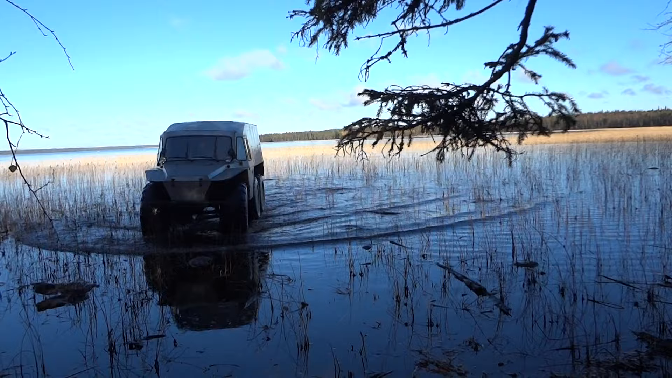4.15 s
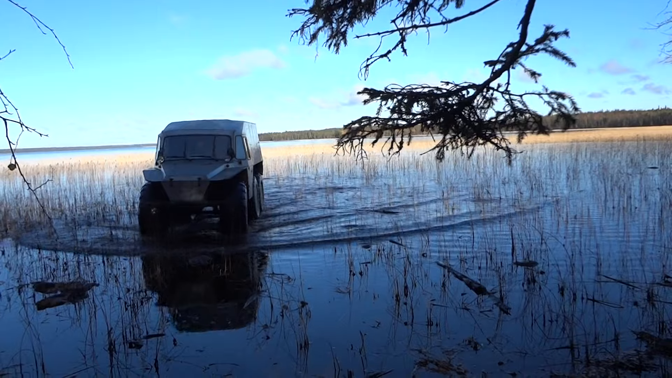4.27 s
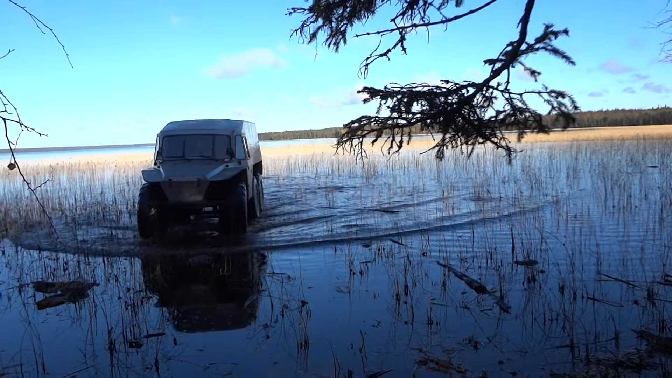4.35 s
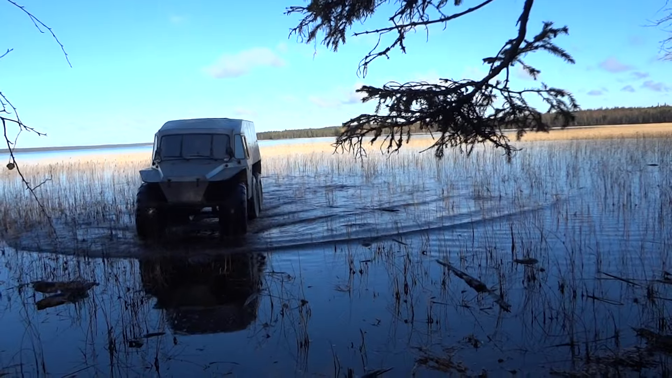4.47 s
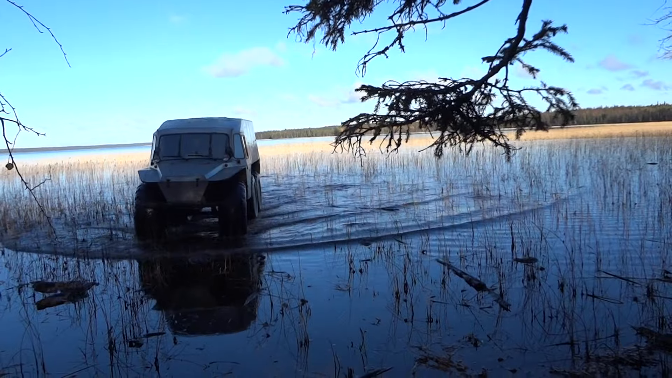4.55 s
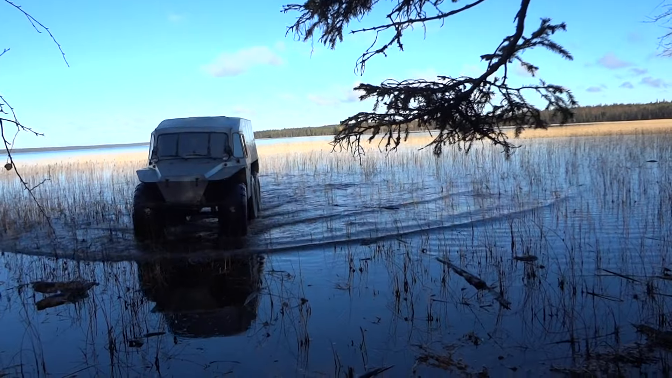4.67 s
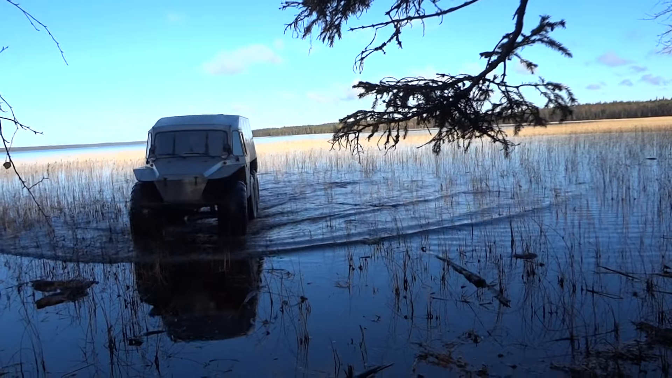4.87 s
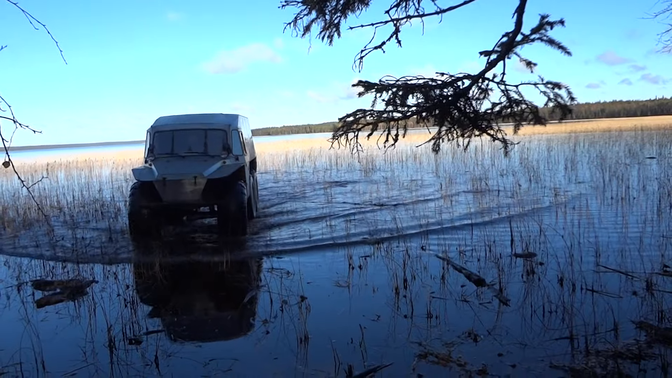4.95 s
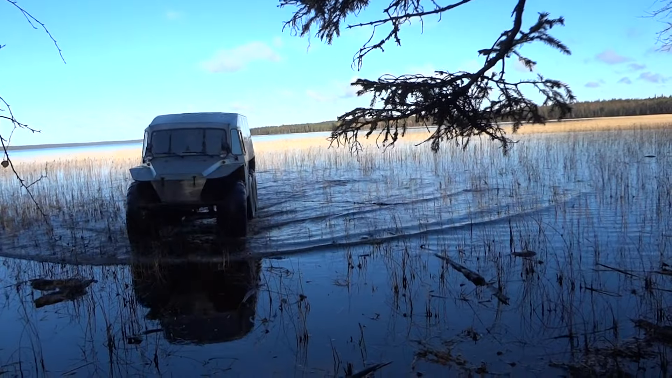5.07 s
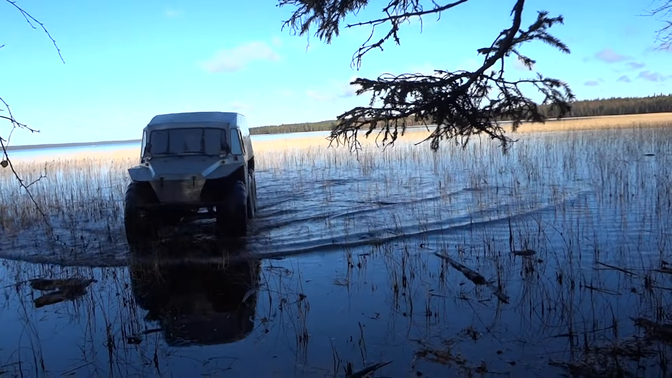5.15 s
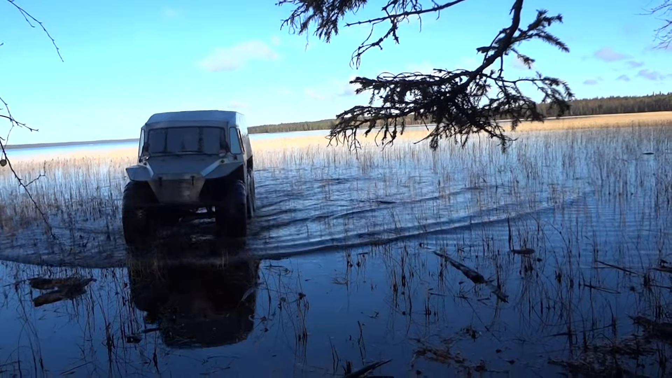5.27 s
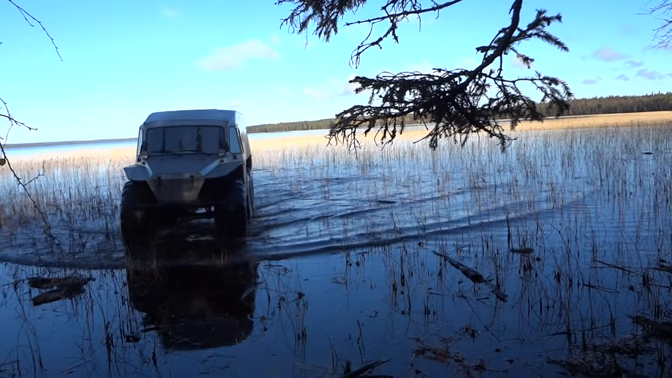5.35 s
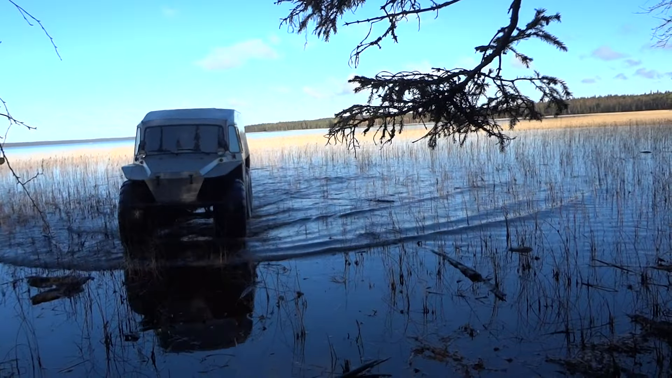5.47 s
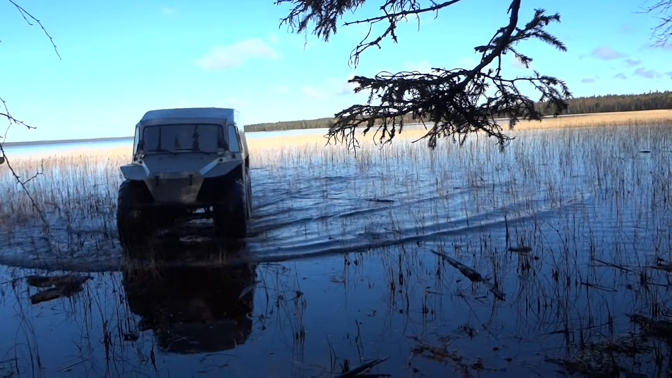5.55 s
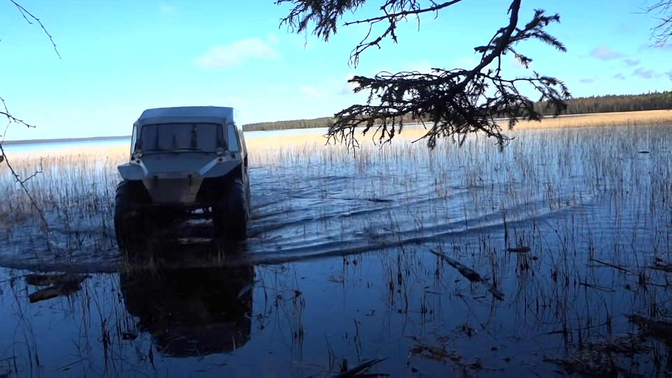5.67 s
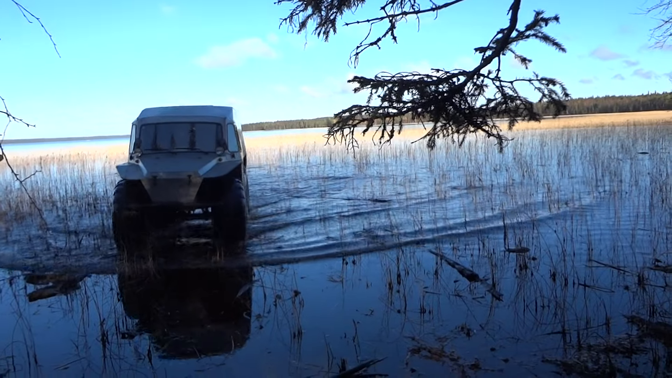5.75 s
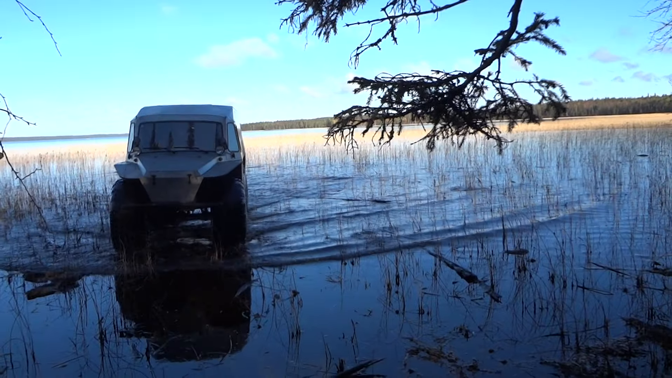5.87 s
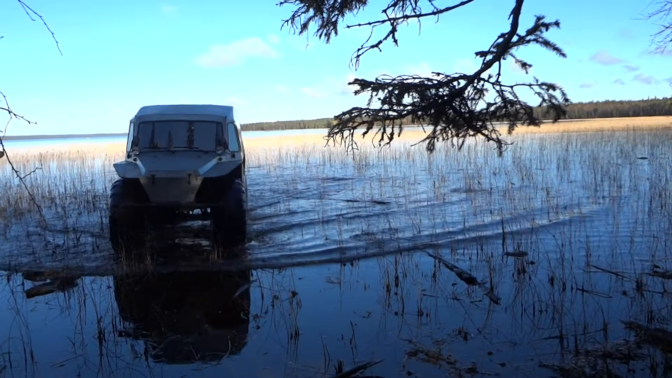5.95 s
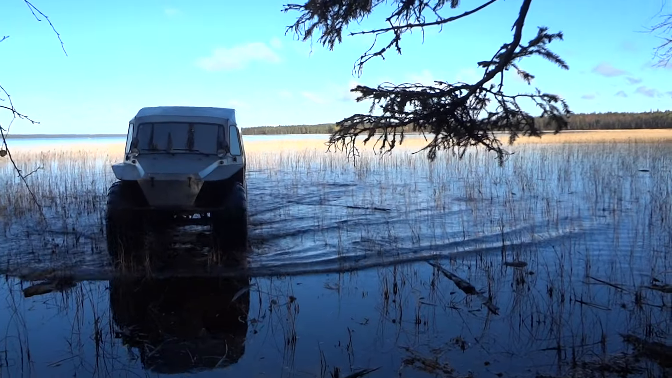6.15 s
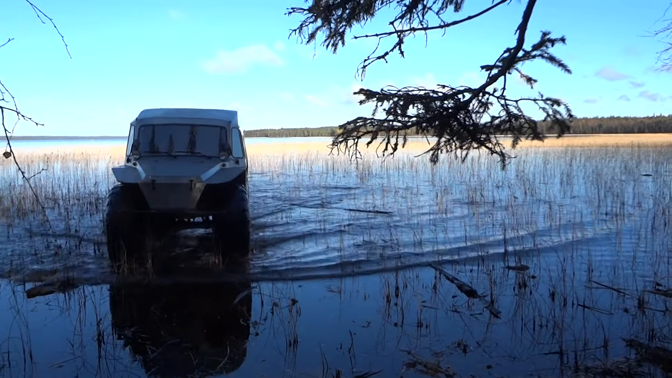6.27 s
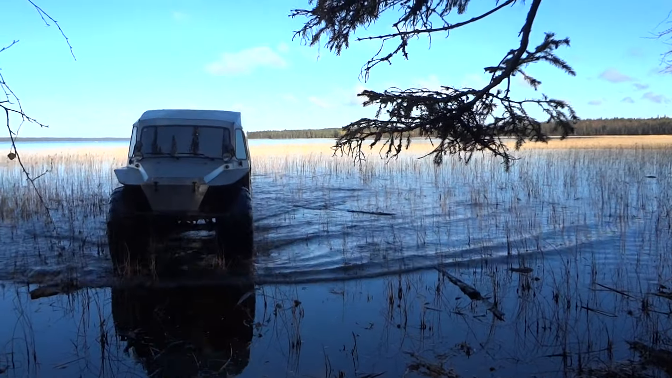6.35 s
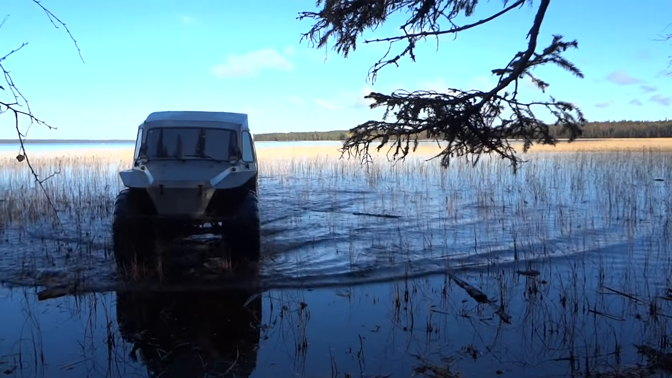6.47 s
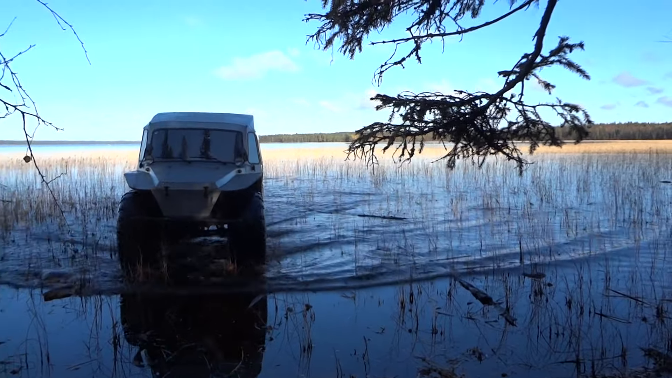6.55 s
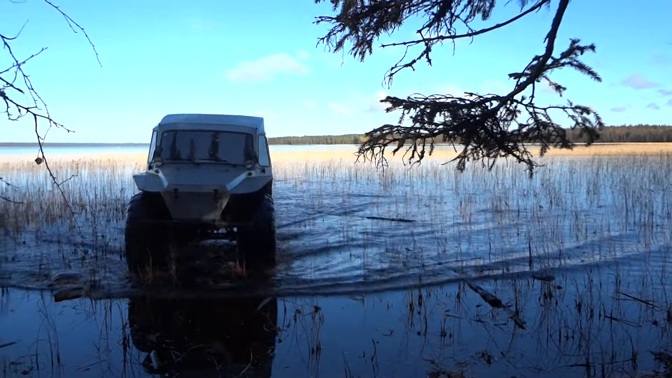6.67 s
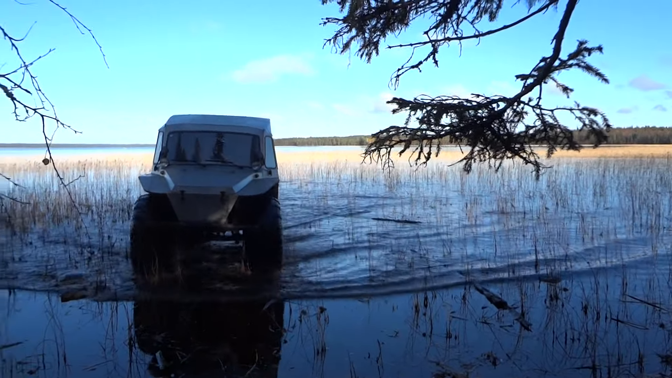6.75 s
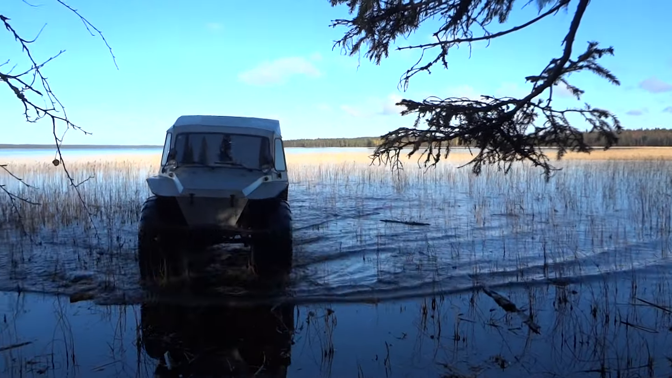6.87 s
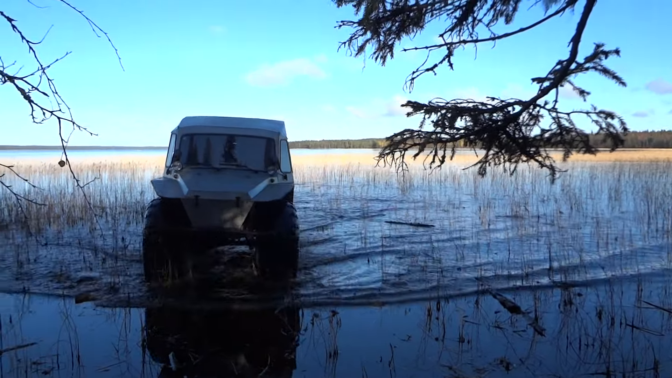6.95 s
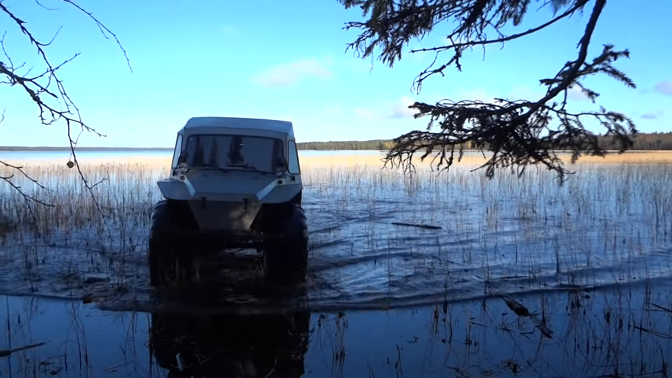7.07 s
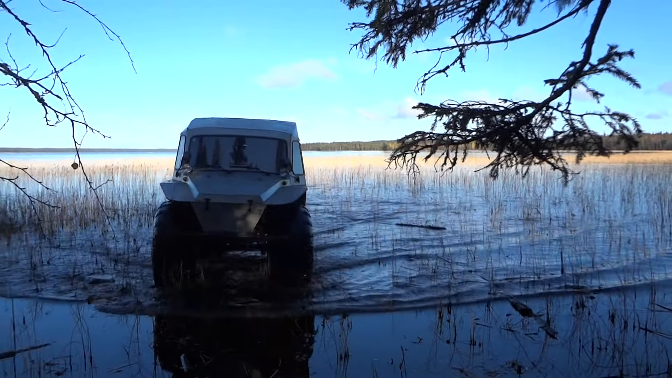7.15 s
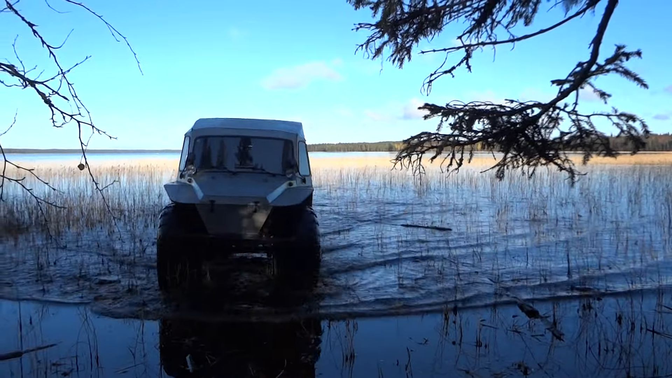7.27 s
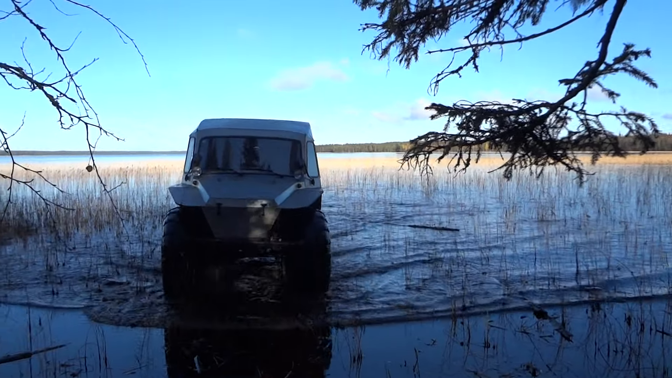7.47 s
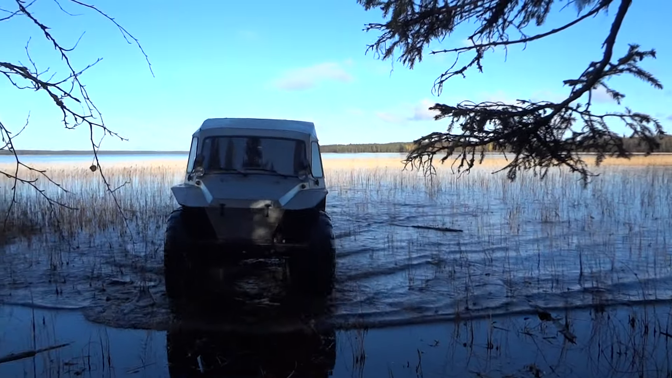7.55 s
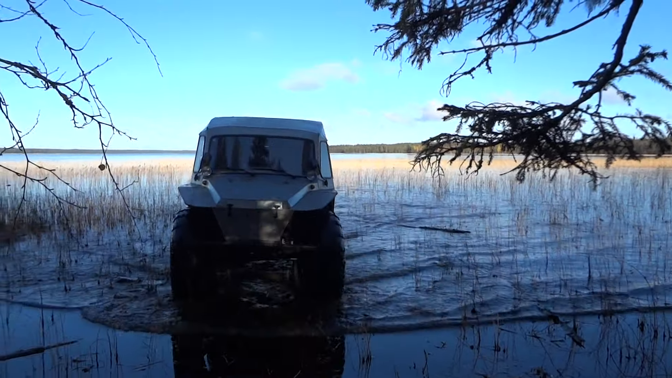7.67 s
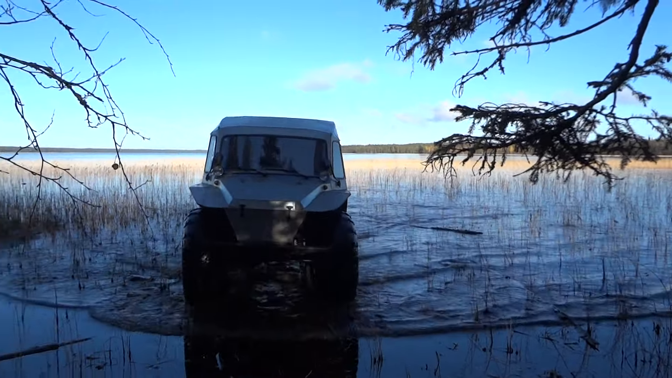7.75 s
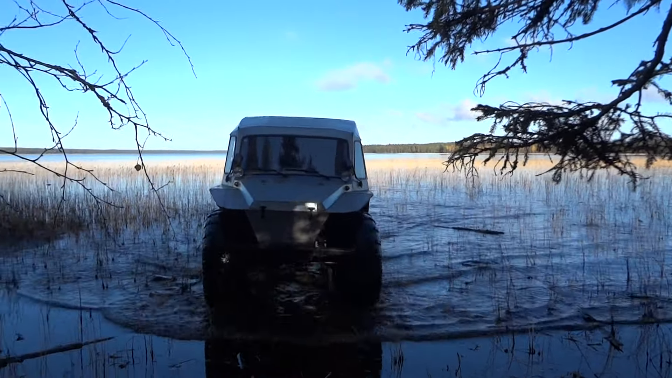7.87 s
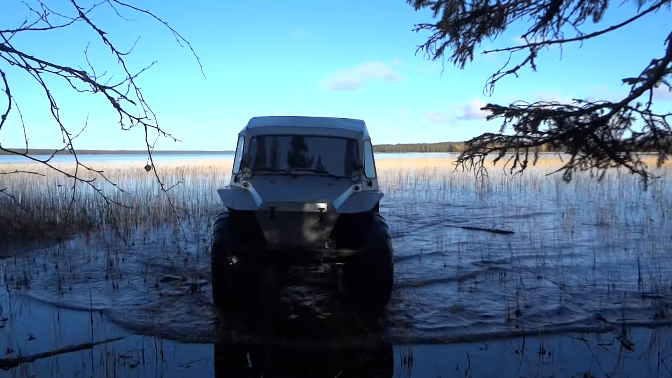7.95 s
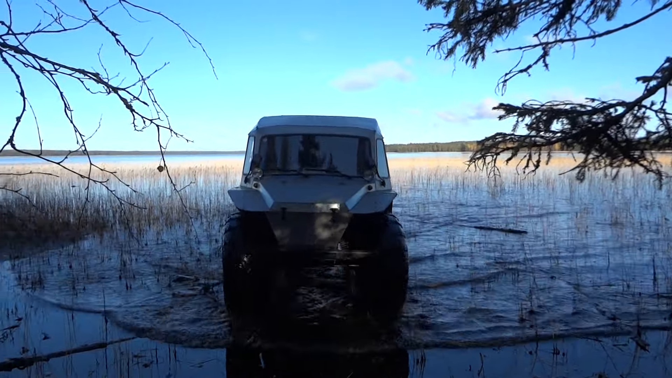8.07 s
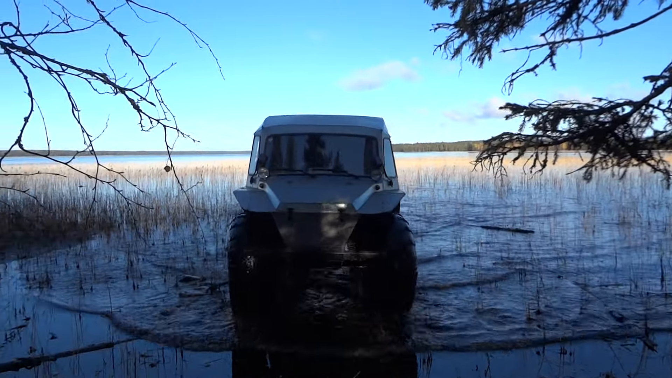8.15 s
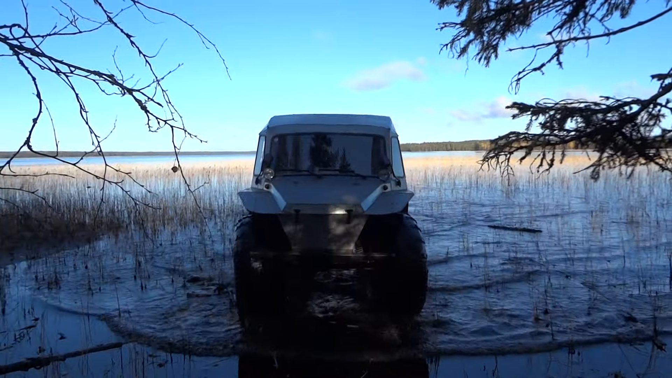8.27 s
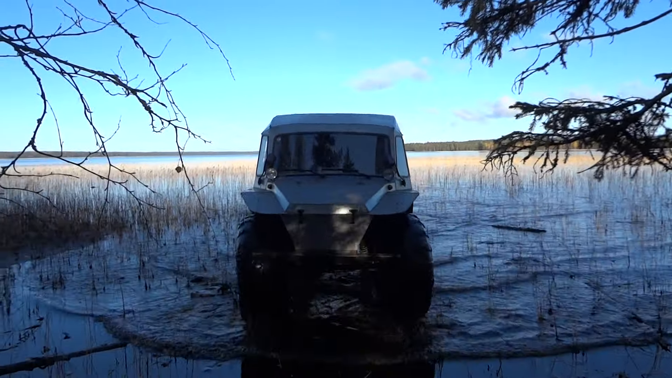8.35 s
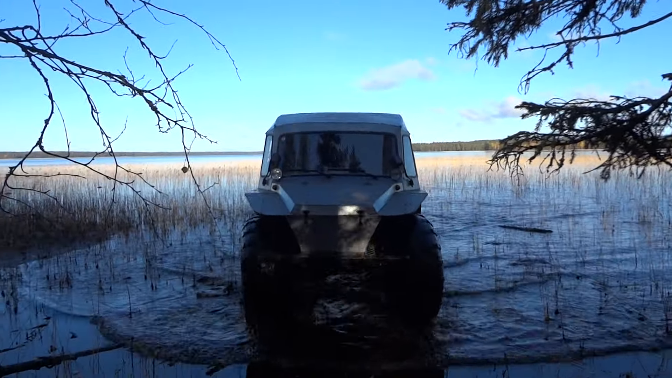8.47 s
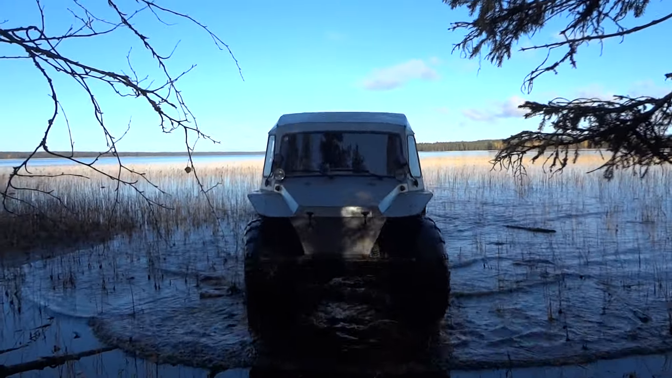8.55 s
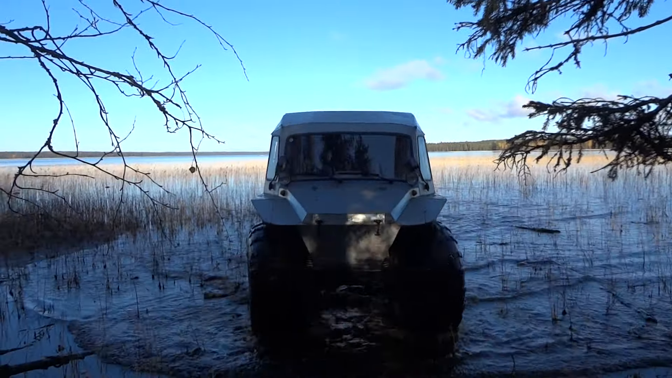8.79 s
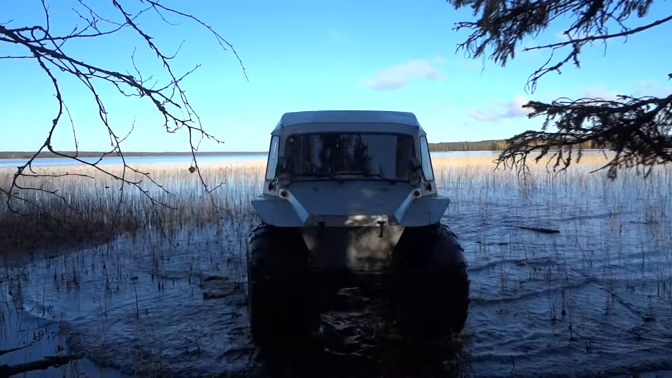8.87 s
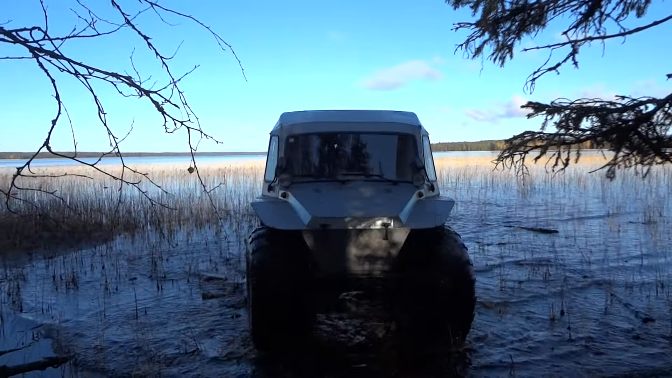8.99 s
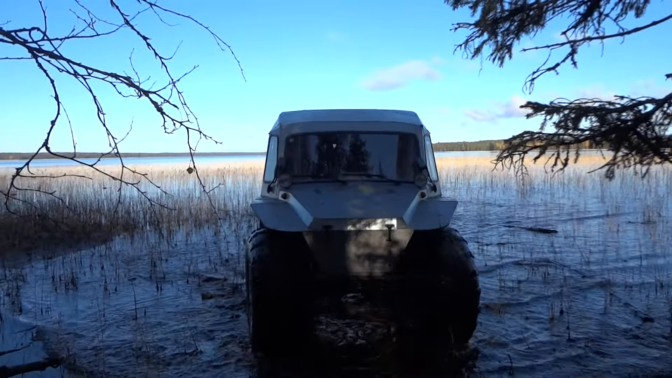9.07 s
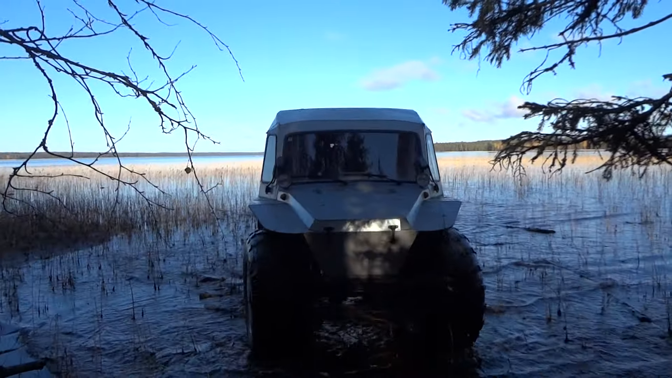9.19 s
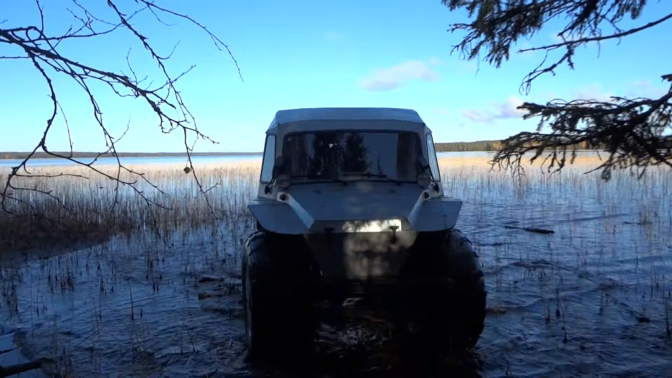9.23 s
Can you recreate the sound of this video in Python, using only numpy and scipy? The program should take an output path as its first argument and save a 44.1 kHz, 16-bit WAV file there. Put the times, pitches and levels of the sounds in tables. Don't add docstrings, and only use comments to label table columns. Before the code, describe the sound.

Low throbbing motor drone rising and sagging about once a second, with wading water growing from light wash to close spray, drips and plops.

```python
import sys
import numpy as np
from scipy import signal
from scipy.fft import rfft, irfft, next_fast_len
from scipy.io import wavfile
from scipy.ndimage import uniform_filter1d, map_coordinates

SR = 44100
rng = np.random.default_rng(int(sys.argv[2]) if len(sys.argv) > 2 else 0)


def linear_from_db(decibels):
    return 10 ** (np.asarray(decibels, float) / 20)


def file_out(sig):
    cols = np.atleast_2d(sig).T
    lim = np.clip(cols, -1, 1)
    pcm = np.round(lim * 32767).astype(np.int16)
    wavfile.write(sys.argv[1], SR, pcm)


N = 424241


def unit(x):
    return x / np.sqrt(np.mean(x ** 2) + 1e-20)


def along(points, hz):
    f, value = np.transpose(points)
    return np.interp(np.log(hz + 1), np.log(f + 1), value)


def curves(rows):
    s, *columns = np.transpose(rows)
    return [np.interp(np.arange(N) / SR, s, column) for column in columns]


def swells(rows):
    s, first, half_s, second = np.transpose(rows)[:, :, None]
    t = np.arange(0, N + 64, 64) / SR
    bump = np.cos(np.clip((t - s) / half_s, -1, 1) * np.pi / 2) ** 2
    sums = [(height * bump).sum(axis=0) for height in (first, second)]
    return [np.interp(np.arange(N) / SR, t, total) for total in sums]


def wobble(rate):
    return map_coordinates(rng.standard_normal(2000), [np.arange(N) * rate / SR])


def filtered(x, response):
    m = next_fast_len(N + 8192)
    return irfft(rfft(x, m) * response(np.fft.rfftfreq(m, 1 / SR)), m)[..., :N]


def coloured(x, spectrum):
    lowest, highest = spectrum[0][0], spectrum[-1][0]
    closed = [(lowest / 2, -120), *spectrum, (highest * 2, -120)]
    return unit(filtered(x, lambda hz: linear_from_db(along(closed, hz))))


def patchy(patchy_db):
    z = signal.stft(rng.standard_normal(N), nperseg=256)[2]
    field = uniform_filter1d(rng.standard_normal(z.shape), size=5, axis=0)
    field = uniform_filter1d(field, size=6, axis=1)
    return signal.istft(z * linear_from_db(patchy_db * unit(field)), nperseg=256)[1][:N]


def bubbles(when, hz, cycles, size, rise):
    t = np.arange(400) / SR
    turns = hz[:, None] * t
    life = turns / cycles
    ring = np.sin(2 * np.pi * turns * (1 + rise * life))
    wave = size[:, None] * ring * life * np.exp(-3 * life) * 8
    at = (when * SR).astype(int)[:, None] + np.arange(400)
    return np.bincount(at.ravel(), wave.ravel(), N + SR)[:N]


def grains(count, mid_hz, spread, cycles, spiky_db):
    u, g = rng.random((count, 2)), rng.standard_normal(count)
    hz = np.clip(mid_hz * np.exp(spread * g), 200, 15000)
    size = linear_from_db(-spiky_db * np.log(u[:, 1] + .004))
    return unit(bubbles(u[:, 0] * N / SR, hz, cycles, size, rise=0.18))


# (t/s, firing rate f/Hz)
ENGINE_SPEED = [
    (0, 61.62),
    (5.6, 61.98),
    (6.7, 59.58),
    (7.7, 59.58),
    (8.9, 56.92),
    (9.62, 55.73),
]
# (t/s, rise f/Hz, half length/s, throttle level/dB)
GOVERNOR_SURGES = [(.25, 3.8, .6, 4.5), (1.35, 4.78, 0.66, 5.5), (2.34, 4.04, 0.58, 4),
                   (3.38, 1.16, 0.42, 1.3), (4.13, 1.07, 0.35, 2.5), (5.02, 1.98, 0.45, 4),
                   (5.68, 1.44, 0.39, 3.5), (6.32, 4.35, .45, 5.5), (7.22, 4.28, 0.52, 5),
                   (8.16, 2.53, 0.47, 2), (9.22, 2.1, 0.31, 3.1)]
# (t/s, level/dB)
APPROACH = [
    (0, -0.5),
    (3, 1),
    (4.5, 4),
    (6, 4),
    (7.5, 6),
    (8.5, 6.5),
    (9.62, 6),
]
# (multiple of firing rate, level/dB, share of approach, dB per Hz of speed, share of throttle)
MAIN_TONES = [(1, -47, 0.033, -0.84, 1.14), (2, -43, 0.021, .01, 1), (3, -29.5, 1.09, 0.13, 0.077),
              (4, -33.5, 0.68, -0.4, 0.58), (1.5, -54, .07, -1.44, 1.4)]
# (multiple of firing rate, main tone it follows, level against that/dB)
UNEVEN_TONES = [(.5, 1, -39), (2.5, 2, -35), (3.5, 2, -18), (4.5, 3, -19), (6, 2, -18)]
# (f/Hz, level/dB)
EXHAUST_PIPE = [(113, 16), (120, 9), (126, -1.5), (170, -4.5), (177, -0.3), (198, -2), (230, -10.5),
                (262, -3)]
# (f/Hz, width/Hz)
SILENCER_BOX = (100.6, 2.6)


def engine():
    rise_hz, throttle_db = swells(GOVERNOR_SURGES)
    throttle_db = np.interp(np.arange(N) + 0.023 * SR, np.arange(N), throttle_db)
    firing_hz = curves(ENGINE_SPEED)[0] + rise_hz
    near_db = curves(APPROACH)[0]
    over_cruise_hz = firing_hz - 62

    tone_db = []
    for k, db, closer, slope, push in MAIN_TONES:
        level = db + along(EXHAUST_PIPE, k * firing_hz)
        level = level + closer * near_db + slope * over_cruise_hz + push * throttle_db
        tone_db.append(level + 0.036 * k ** 2 * wobble(4) + 0.17 * wobble(16))

    turn = 2 * np.pi * np.cumsum(firing_hz * (1 + 0.0026 * wobble(16))) / SR
    box_hz, width_hz = SILENCER_BOX

    def tone(k, db):
        hz = k * firing_hz
        lag = np.arctan2(hz * width_hz, box_hz ** 2 - hz ** 2)
        return linear_from_db(db + 0.022 * k * wobble(12)) * np.sqrt(2) * np.sin(k * turn - lag)

    hum = sum(tone(row[0], db) for row, db in zip(MAIN_TONES, tone_db))
    hum += tone(5, 1.85 * tone_db[1] + 13.5 + 2.2 * wobble(5))
    for k, lead, db in UNEVEN_TONES:
        hum += tone(k, tone_db[int(lead) - 1] + db + .45 * k * wobble(3))
    return hum


# (t/s, level/dB, heaviness/dB)
WADING_WATER = [(0.0, -41, -1.5), (0.43, -40.5, -1), (1.6, -38, 0.5), (3.24, -36.5, -1.5), (3.8, -37, 0),
                (5.01, -34.5, -1), (5.49, -35.5, -0.5), (6.67, -31.5, 0), (7.45, -32.5, 0.5),
                (8.41, -30.5, 0.5), (9.43, -30, -0.5), (9.62, -27.5, 0)]
# (t/s, level/dB, half length/s, heaviness/dB)
LUG_SPLASHES = [(.21, 0, 0.1, 1.5), (1.12, 0, 0.26, 1), (1.93, 0.5, 0.19, -1.5), (2.09, 0, .07, 2.5),
                (2.92, 0.5, .1, -1), (3.1, 0, 0.074, 3.5), (4.44, -1, 0.039, 0.5), (5.09, 0, .1, 2.5),
                (5.49, 0, .06, 0), (5.95, 2.5, 0.031, 2.5), (6.6, -0.5, 0.13, 1.5), (7.02, 0.5, 0.097, 1.5),
                (8.09, 4, 0.056, -1.5), (8.525, 2.5, 0.027, 2), (8.71, 1, .08, 0.5), (9.16, 1, 0.1, 1.5),
                (9.27, 0.5, .05, 1), (9.46, 2, 0.06, 0.8), (9.58, 4, 0.024, .3)]
# (level over the middle wading/dB, growth with wading, answer to heaviness)
WATER_LAYERS = [
    (-5.5, 0.88, 0.65),
    (4.5, 0.58, 0.86),
    (2, 0.93, -0.14),
    (-9, 1.07, -0.24),
]
# (f/Hz, level/dB)
RUMBLE_COLOUR = [(20, -18), (45, -14), (70, -3.5), (140, -5), (220, -3), (300, 3), (400, -0.5), (520, -13),
                 (800, -18)]
CHURN_COLOUR = [(300, -38), (480, -7.5), (620, -1.5), (760, -1), (950, -6), (1200, -3.5), (1500, -8),
                (2200, -39), (4000, -39)]
SPRAY_COLOUR = [(900, -51), (1500, -5.5), (1900, 0.5), (2800, -1.5), (3800, -4), (4600, -8), (5500, -8.5),
                (6500, -12.5), (9000, -29.5), (13000, -55)]
MIST_COLOUR = [(3500, -2), (6000, -4.5), (8000, -0.5), (10000, -2.5), (12000, -9), (14000, -10.5),
               (16000, -15)]
# (f/Hz, level/dB)
BOW_WAVE_COLOUR = [(900, -36), (1250, 8), (1500, 1.5), (1800, -6), (2400, -41)]


def wash():
    wading_db, heavy_db = curves(WADING_WATER)
    splash_db, thick_db = swells(LUG_SPLASHES)
    middle = wading_db.mean()
    thrown_db = wading_db + splash_db - middle
    heaviness_db = heavy_db + thick_db
    rumble_db, churn_db, spray_db, mist_db = [middle + db + grows * thrown_db + leans * heaviness_db
                                              for db, grows, leans in WATER_LAYERS]
    surge, flick = wobble(16), wobble(45)

    churn_bubbles = grains(count=6000, mid_hz=849, spread=0.358, cycles=2.9, spiky_db=2.5)
    spray_bubbles = grains(count=8000, mid_hz=3300, spread=0.447, cycles=3.6, spiky_db=3.0)
    mist_bubbles = grains(count=12000, mid_hz=10100, spread=0.414, cycles=7.2, spiky_db=2.5)
    rumble = coloured(patchy(0.71), RUMBLE_COLOUR)
    churn = coloured(patchy(0.68) + .12 * churn_bubbles, CHURN_COLOUR)
    spray = coloured(patchy(1.0) + 0.2 * spray_bubbles, SPRAY_COLOUR)
    mist = coloured(patchy(1.0) + 0.43 * mist_bubbles, MIST_COLOUR)
    bow_wave = coloured(patchy(3.1), BOW_WAVE_COLOUR)

    low = linear_from_db(rumble_db + 5.5) * rumble
    low += linear_from_db(churn_db - 1.11 + 0.25 * surge) * churn
    low += linear_from_db(spray_db - 2.58 + 0.41 * surge + 0.18 * flick) * spray
    high = linear_from_db(mist_db - 0.84 + 0.26 * surge + 0.44 * flick) * mist
    high += linear_from_db(2.456 * churn_db + 29.5 + 1.2 * surge) * bow_wave
    return low, high


# (t/s, level over the wash/dB, centre f/Hz, width/octaves)
CLEAR_DROPS = [(.2471, 6, 7470, 0.32), (1.7215, 7, 11060, .17), (1.986, 13, 7510, 0.13),
               (2.6583, 5, 4250, .8), (2.8165, 7.5, 7550, 0.81), (2.9387, 9, 6000, 0.68),
               (3.2275, 6.5, 6050, 1.2), (3.6448, 7, 8910, .62), (4.394, 7, 8160, 0.34),
               (4.4902, 7, 9570, 0.31), (4.673, 7, 3590, .63), (5.4596, 6, 7140, 1.3),
               (5.4941, 11, 11470, .3), (5.969, 9, 4740, 0.24), (6.297, 7, 4820, 0.52),
               (6.539, 7, 6440, 1.2), (7.9539, 6, 9470, 0.33), (8.0998, 3, 10210, 0.48),
               (8.3545, 9, 9480, 0.39), (8.5185, -1, 3680, 1.14), (8.8722, 4, 3280, 0.73),
               (8.92, 6, 11010, 0.26), (8.9789, 8, 10280, 0.46), (9.1969, 5, 7110, .71),
               (9.2586, 7.5, 8760, 0.56), (9.2688, 5, 9400, 0.32), (9.366, 8, 8510, 0.51),
               (9.4535, 7, 11950, 0.38), (9.5717, 2, 8740, 1.3), (9.5812, 4, 5580, 1.4)]
# (level/dB, level/dB)
FAINT_RANGE = (-3, 3.5)


def falling_drops(faint_count):
    u, g = rng.random((faint_count, 2)), rng.standard_normal((faint_count, 2))
    db = np.interp(u[:, 1], (0, 1), FAINT_RANGE)
    hz = 8000 * np.exp(.35 * g[:, 0])
    octaves = .4 * np.exp(.3 * g[:, 1])
    return np.r_[CLEAR_DROPS, np.c_[u[:, 0] * N / SR, db, hz, octaves]]


def ticks(spray, drops):
    hz, t, z = signal.stft(spray, SR, nperseg=64, noverlap=48)
    flash = np.zeros(z.shape)
    tick_ms = 3.5
    for s, db, mid_hz, octaves in drops:
        near = slice(*np.searchsorted(t, [s - .02, s + .04]))
        u = (t[near] - s) / (tick_ms * 0.0006 + 0.0006)
        band = np.exp(-.25 * (np.log2((hz + 1) / mid_hz) / (1.34 * octaves)) ** 2)
        puff = np.where(u < 0, np.exp(-3.5 * u ** 2), np.exp(-.9 * abs(u)))
        flash[:, near] += linear_from_db(db + 3.5) * np.outer(band, puff)
    return signal.istft(z * flash, SR, nperseg=64, noverlap=48)[1][:N]


# (t/s, peak level/dB, f/Hz)
AIR_POCKETS = [(2.053, -12, 697), (2.729, -18, 990), (2.997, -13, 856), (3.817, -20, 850), (5.74, -7, 716),
               (5.855, -9.5, 740), (5.918, -11, 733), (5.937, -8, 860), (6.5, -12, 786),
               (6.535, -11.5, 730), (6.642, -7, 710), (6.848, -6, 804), (7.041, -7.5, 778),
               (8.082, -12, 770), (8.091, -15, 1220), (8.097, -7, 779), (8.178, -13, 856),
               (8.515, -7, 1890), (8.529, -9, 913), (8.532, -9, 1890), (9.474, -13, 2100),
               (8.679, -4, 1224), (8.87, -13, 929), (8.921, -12, 783), (9.122, -12, 754),
               (9.153, -2.5, 635), (9.46, -3, 1534), (9.523, -6, 1016), (9.568, -18, 993)]


def plops():
    s, db, hz = np.transpose(AIR_POCKETS)
    return bubbles(s, hz, cycles=3.7, size=linear_from_db(db - 11), rise=0.072)


# (f/Hz, level/dB)
WATER_SHINE = [(300, 0), (4000, -1), (7000, -2), (12000, 0), (15000, -8)]
# (f/Hz, phase/rad)
RIPPLE_PHASE = [(450, 0.084), (1500, 1.16), (6000, 3.23), (12000, 2.1)]


def mirrored(x, delay_ms, db):
    glance = filtered(x, lambda hz: linear_from_db(along(WATER_SHINE, hz)) * np.exp(1j * along(RIPPLE_PHASE, hz)))
    late = map_coordinates(glance, [np.arange(N) - delay_ms * SR / 1000])
    return (x + linear_from_db(db) * late) / np.sqrt(1 + linear_from_db(db) ** 2)


# (f/Hz, phase/rad)
PORT_LEAD = [(30, .3), (60, .36), (150, .7), (450, .95), (1000, .6), (1600, .42), (3000, .17), (7000, .1),
             (15000, 0)]
# (f/Hz, level/dB)
PORT_BALANCE = [(60, -3.4), (190, -2.6), (400, -2), (800, -.5), (1500, 0), (3000, .2), (6500, .6),
                (9500, -.9), (15000, -1.2)]


def two_ports(x):
    def response(hz):
        half = linear_from_db(along(PORT_BALANCE, hz) / 2) * np.exp(-.5j * along(PORT_LEAD, hz))
        return np.array([half, 1 / half]) * 2 / abs(half + 1 / half)
    return filtered(x, response)


# (t/s, wheel delay/ms, wheel level/dB, mist delay/ms, mist level/dB)
WATER_PATHS = [
    (0, 1.23, -13, 1.187, -8),
    (1.5, 1.19, -10, 1.156, -11),
    (1.62, 1.174, -8.5, 1.3, -11),
    (9.62, 1.186, -8.5, 0.88, -11),
]
# (t/s, left minus right level/dB)
VEHICLE_SIDE = [
    (0.0, 1.55),
    (6.21, 1.45),
    (8.65, .1),
    (9.62, 0),
]
# (f/Hz, level/dB)
SCATTERED = [(60, -36), (300, -29), (1000, -19), (3000, -16.5), (6000, -15.5), (9000, -18.5), (15000, -18)]


def scene():
    wheel_ms, wheel_db, mist_ms, mist_db = curves(WATER_PATHS)
    low, mist = wash()
    far_low, far_mist = wash()
    drops = falling_drops(faint_count=60)
    low = mirrored(low + ticks(far_low, drops) + plops(), wheel_ms, wheel_db)
    mist = mirrored(mist + ticks(far_mist, drops), mist_ms, mist_db)

    side_db = curves(VEHICLE_SIDE)[0]
    hull = two_ports(low + engine()) * linear_from_db([side_db / 2, -side_db / 2])
    haze = two_ports(mist) * linear_from_db([[.6], [-.6]])
    scatter = filtered(far_low + far_mist, lambda hz: linear_from_db(along(SCATTERED, hz)))
    return hull + haze + scatter * [[1], [-1]]


def top_cut(x):
    return signal.sosfilt(signal.butter(12, 15960, fs=SR, output="sos"), x)


def record(dry):
    mix = filtered(dry, lambda hz: hz < 15770)
    return top_cut(mix)


dry = scene()
out = record(dry)
file_out(out)
```